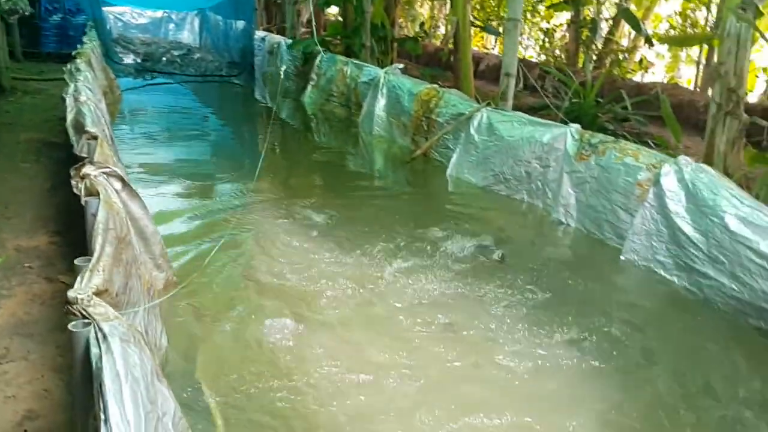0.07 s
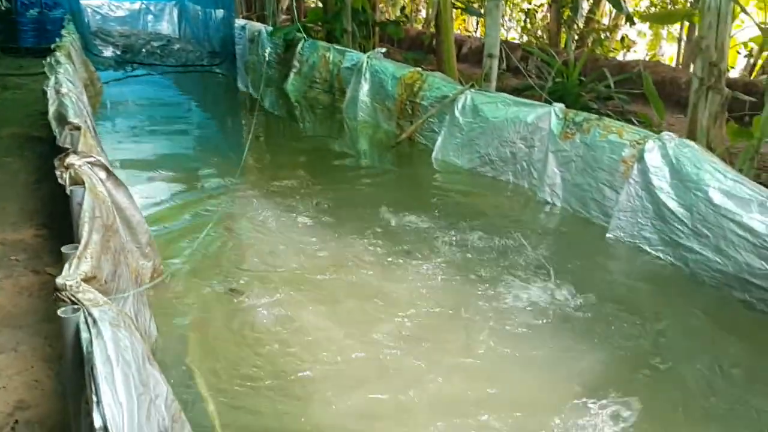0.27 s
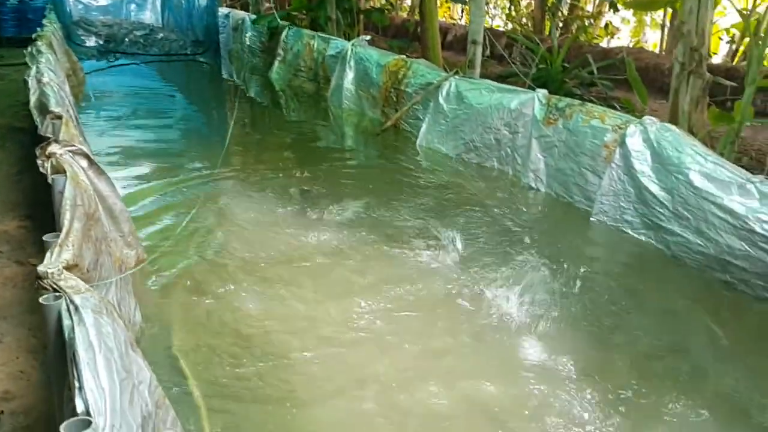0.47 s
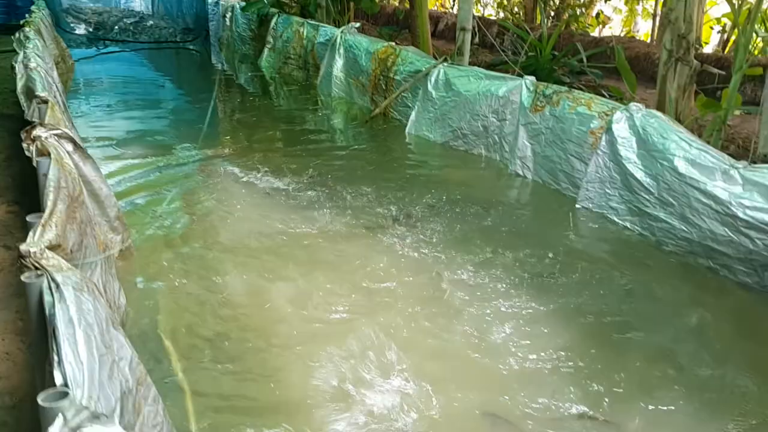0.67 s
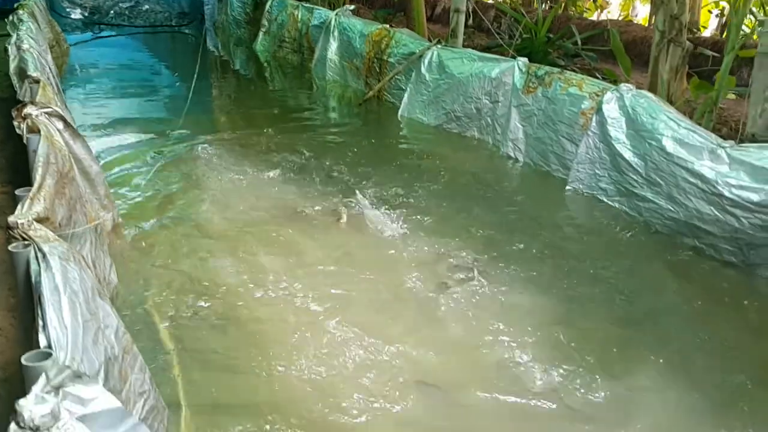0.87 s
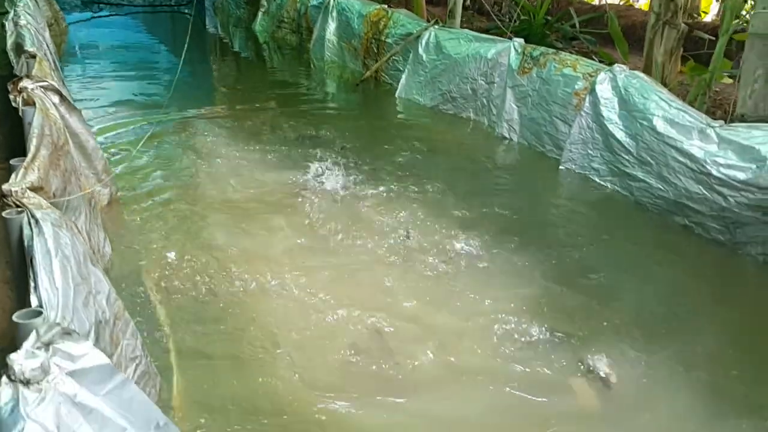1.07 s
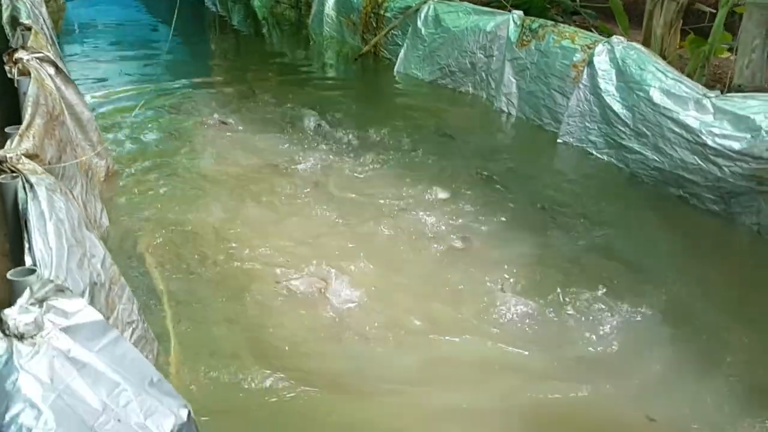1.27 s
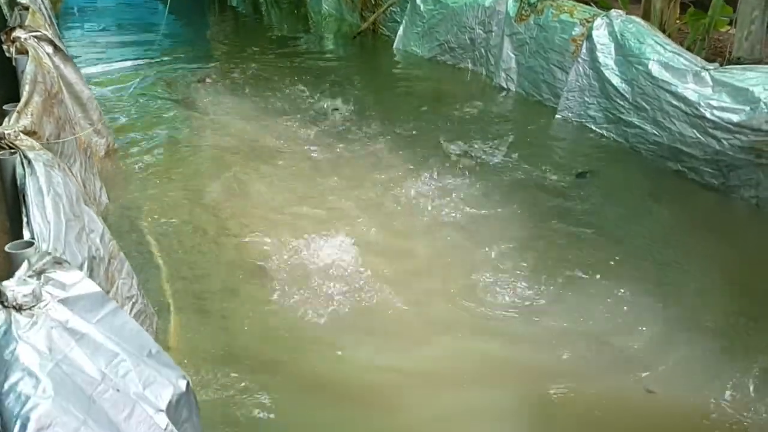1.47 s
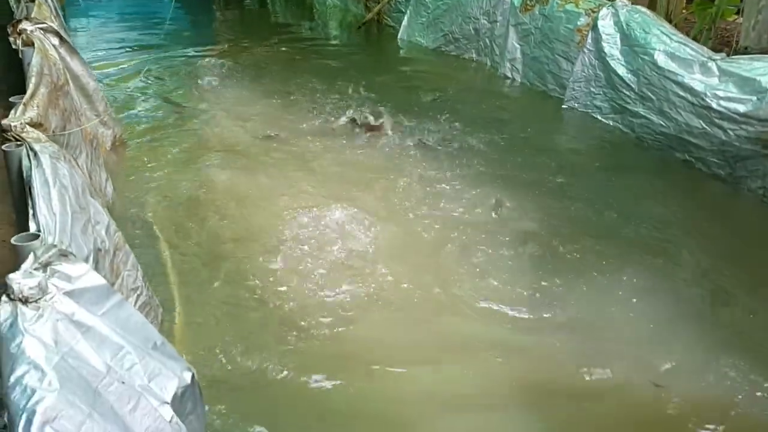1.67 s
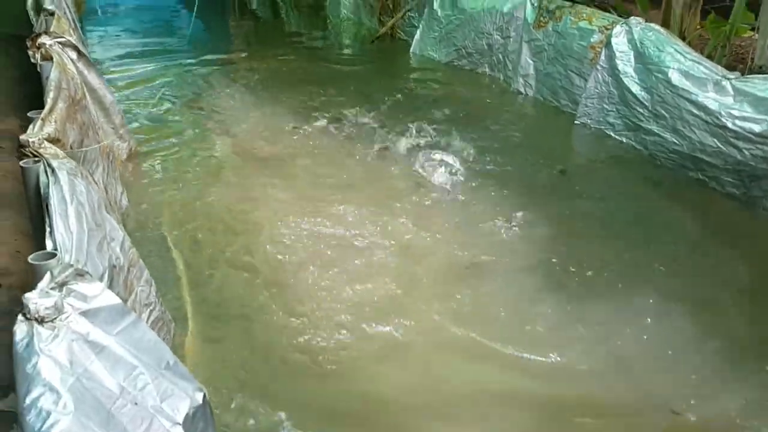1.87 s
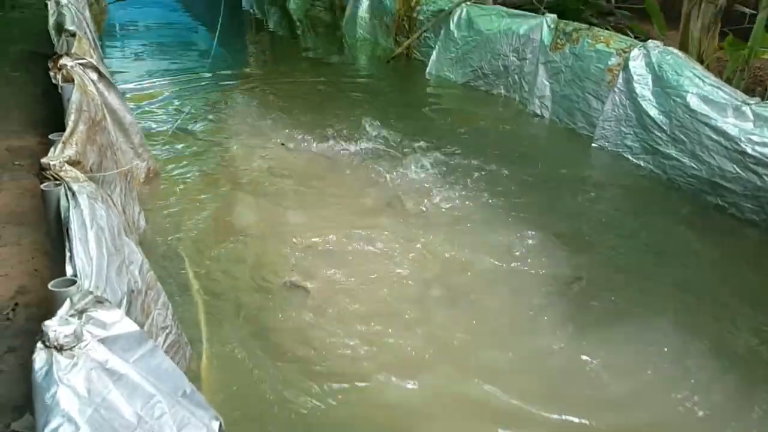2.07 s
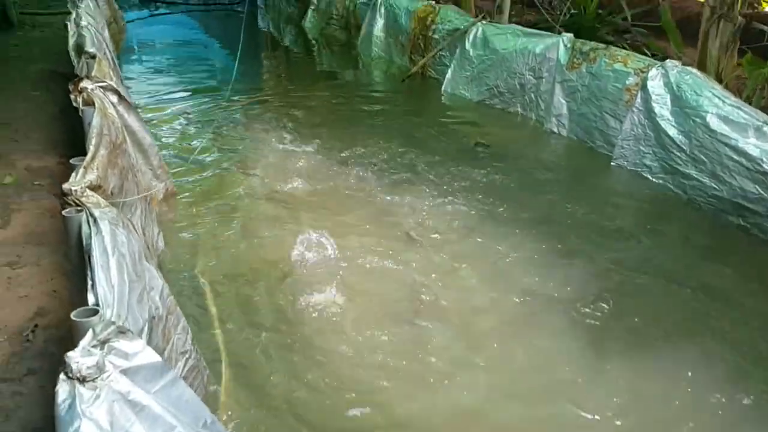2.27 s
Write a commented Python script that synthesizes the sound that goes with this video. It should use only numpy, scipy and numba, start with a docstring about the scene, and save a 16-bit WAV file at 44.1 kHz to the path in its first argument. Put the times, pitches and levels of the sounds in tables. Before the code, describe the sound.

Many small fish splash at a pond surface in a feeding frenzy, with rapid tail slaps, bubbly plops and fine spray over steady churning water; outdoors, close, almost entirely in the left channel, right very faint.

```python
"""Sheet-lined pond outdoors: small fish feed at the surface, over a steady patter of churned water.
Slaps and spray are decaying band noise; gulps, bubbles, drops and thrashing are decaying, sliding sines.
Churned water adds drops, dry ticks and flickering noise. Mist and a light, rising wind are shaped noise.
A small bird whistles once, a gliding sine.
The left microphone faces the pond; the right is nearly blocked and hears it faintly, over its own hiss."""
import sys
import numpy as np
from scipy import signal
from scipy.fft import rfft, irfft, next_fast_len
from scipy.io import wavfile
from numba import njit

SR = 44100
rng = np.random.default_rng(int(sys.argv[2]) if len(sys.argv) > 2 else 0)


def digitize_waveform(pressure):
    """Quantize a signal to 16-bit integers and store it at the path in sys.argv[1].

    Rows of a 2-D input are taken as channels; values are limited to [-1, 1].
    """
    field = np.atleast_2d(pressure).T
    bounded = np.clip(field, -1, 1)
    quanta = np.round(bounded * 32767).astype(np.int16)
    wavfile.write(sys.argv[1], SR, quanta)


N = 102753

# All table levels are relative; each source adds its own gain.
# larger bubbles trapped by mouths and tails: (time [s], pitch [Hz], level [dB], nominal ring time [s])
BUBBLES = [(0.0793, 1473, -29, 0.04), (0.1287, 1034, -32, 0.024), (0.1776, 2098, -33, 0.033),
           (0.1796, 3107, -30, 0.049), (0.1856, 1309, -29, 0.018), (0.1896, 817, -28, 0.025),
           (0.2115, 995, -24, 0.034), (0.2424, 471, -36, 0.04), (0.2519, 1362, -28, 0.027),
           (0.2519, 2098, -33, 0.019), (0.2529, 2987, -32, 0.039), (0.2674, 3635, -34, 0.034),
           (0.2705, 4977, -30, 0.01), (0.2764, 597, -37, 0.03), (0.2834, 480, -35, 0.03),
           (0.2938, 2872, -34, 0.021), (0.4146, 1119, -19, 0.03), (0.4151, 2987, -29, 0.02),
           (0.4255, 1164, -29, 0.03), (0.4195, 900, -26, 0.02), (0.4415, 1164, -33, 0.02),
           (0.458, 4424, -30, 0.01), (0.4899, 698, -27, 0.035), (0.507, 560, -33, 0.015),
           (0.5108, 3932, -36, 0.018), (0.6151, 1593, -31, 0.021), (0.6311, 1034, -28, 0.021),
           (0.7114, 1473, -32, 0.051), (0.7398, 2098, -31, 0.028), (0.8531, 1532, -29, 0.027),
           (0.8531, 2987, -23, 0.03), (0.8635, 1259, -31, 0.034), (0.895, 2455, -29, 0.031),
           (1.0257, 2553, -29, 0.035), (1.0721, 817, -32, 0.063), (1.1344, 786, -29, 0.04),
           (1.1778, 2269, -30, 0.024), (1.1983, 1593, -31, 0.024), (1.1998, 1210, -31, 0.037),
           (1.2477, 2182, -28, 0.027), (1.2626, 2017, -33, 0.016), (1.3424, 1724, -26, 0.03),
           (1.3464, 755, -23, 0.054), (1.3679, 671, -34, 0.058), (1.3684, 2098, -30, 0.021),
           (1.3784, 1259, -28, 0.016), (1.4068, 1532, -30, 0.022), (1.4108, 671, -34, 0.034),
           (1.4345, 1259, -24, 0.03), (1.4382, 3635, -30, 0.028), (1.4517, 5000, -23, 0.01),
           (1.4578, 919, -23, 0.022), (1.4435, 1300, -24, 0.02), (1.4632, 3107, -33, 0.025),
           (1.4995, 919, -24, 0.012), (1.5066, 1259, -32, 0.04), (1.5101, 646, -30, 0.025),
           (1.5365, 345, -19, 0.036), (1.537, 1939, -31, 0.06), (1.7086, 1657, -32, 0.019),
           (1.7425, 1657, -28, 0.024), (1.7535, 3107, -35, 0.021), (1.773, 1657, -31, 0.049),
           (1.7745, 900, -27, 0.025), (1.778, 4786, -27, 0.012), (1.7994, 1034, -30, 0.022),
           (1.8009, 2455, -33, 0.031), (1.8588, 2098, -29, 0.031), (1.8588, 4254, -31, 0.018),
           (1.9326, 490, -35, 0.04), (1.9476, 1210, -30, 0.022), (1.9496, 817, -29, 0.042),
           (2.0169, 3635, -36, 0.021), (2.0184, 1657, -30, 0.027), (2.0513, 552, -34, 0.052),
           (2.0833, 2553, -31, 0.022), (2.1072, 995, -29, 0.028), (2.312, 800, -32, 0.03)]
# deep gulps: (time [s], level [dB], pitch [Hz])
GULPS = [(0.2635, -32, 390), (0.434, -50, 360), (0.507, -43, 285), (0.615, -47, 355), (0.702, -42, 385),
         (1.151, -45, 360), (1.176, -42, 330), (1.245, -37, 220), (1.294, -46, 330), (1.495, -42, 398),
         (1.5375, -42, 200), (1.729, -50, 296), (2.161, -43, 420), (2.176, -43, 210), (2.216, -39, 390),
         (2.268, -47, 400)]
GULP_CYCLES, ATTACK_CYCLES, BUBBLE_RISE_PER_CYCLE, NEIGHBOUR_GAIN = 4.5, .45, .0012, .35
BUBBLE_DELAY_S, BUBBLE_RING_SHARE, POP_DB, POP_CYCLES, BUBBLE_SLIDE = .0013, .8, 2.5, 3.5, .008
GULP_FLOOR_HZ = 185
# tail slaps on the surface: (time [s], level [dB], centre [Hz])
SLAPS = [(0.1047, -33, 3500), (0.1795, -32, 3090), (0.2535, -25, 3200), (0.3356, -33, 1600),
         (0.3745, -33, 2050), (0.4155, -23, 2200), (0.4913, -32, 2850), (0.5117, -30, 2400),
         (0.6155, -30, 1560), (0.7407, -27, 2490), (0.853, -29, 2400), (0.8959, -26, 2800),
         (0.9348, -28, 3200), (0.9872, -30, 3000), (1.0126, -33, 2840), (1.054, -30, 3000),
         (1.1608, -33, 2460), (1.1787, -29, 2800), (1.1992, -36, 1540), (1.2486, -27, 2200),
         (1.3428, -29, 1730), (1.3718, -27, 1900), (1.4381, -25, 3200), (1.446, -28, 2000),
         (1.461, -30, 3000), (1.5005, -30, 1660), (1.5375, -30, 4500), (1.6072, -32, 3430),
         (1.7085, -33, 4540), (1.7444, -30, 1660), (1.7774, -25, 4500), (1.7998, -30, 1670),
         (1.8592, -25, 3000), (2.0168, -31, 2400), (2.138, -32, 5000), (2.1789, -32, 2400),
         (2.2513, -37, 2400)]
SLAP_WIDTH_OCT, SLAP_CRACK_DB, SLAP_T60_S = 1.3, -1.5, .07
SLAP_NOISE_DB, SLAP_CLOUD_DB, SLAP_FLOOR_HZ = -2.5, -7, 300
BURST_GRAIN_DB, CRACK_HEIGHT = 2.5, 2.2  # slaps and spray
# longer thrashing of several fish: (start [s], length [s], level [dB], centre [Hz])
THRASHES = [(.245, .06, -36, 1500), (.85, .12, -37, 800), (1.34, .08, -32, 1500), (1.432, .048, -27, 2000),
            (1.5, .04, -34, 1100), (1.92, .06, -36, 1000), (2.04, .07, -36, 1500), (2.135, .03, -36, 4800),
            (1.38, .05, -38, 3500)]
THRASH_WIDTH_OCT = .8
# bursts of fine spray: (time [s], level [dB], centre [Hz], decay to -60 dB [s])
SPRAY = [(0.3356, -45, 9550, 0.09), (0.3726, -46, 9150, 0.09), (0.4564, -45, 8770, 0.09),
         (0.5716, -44, 9060, 0.09), (0.7407, -43, 12000, 0.04), (0.7482, -38, 8600, 0.06),
         (0.8759, -42, 9570, 0.04), (0.8954, -28, 12500, 0.028), (1.054, -45, 8870, 0.09),
         (1.0874, -47, 7670, 0.09), (1.1473, -52, 10000, 0.09), (1.1782, -39, 10800, 0.07),
         (1.2486, -48, 6940, 0.09), (1.4381, -42, 9440, 0.25), (1.5, -46, 8040, 0.09),
         (1.5329, -43, 9070, 0.04), (1.5988, -47, 9420, 0.09), (1.7719, -38, 13000, 0.03),
         (1.778, -35, 9000, 0.06), (1.8592, -37, 9920, 0.15), (1.9829, -45, 11100, 0.09),
         (2.0787, -43, 9000, 0.15), (2.139, -38, 6980, 0.06)]
SPRAY_WIDTH_OCT = 1.1
# activity of the shoal: (time [s], churned water level [dB], fine mist level [dB])
ACTIVITY = [(0.0, -42, -62), (0.15, -42, -62), (0.52, -43, -62), (1.06, -44, -65), (1.3, -45, -64),
            (1.59, -42, -63), (1.97, -42, -62), (2.06, -43, -62), (2.21, -46, -67), (2.33, -46, -67)]
# churned water spectrum: (frequency [Hz], density [dB per Hz])
CHURN_SPECTRUM = [(88, -49), (150, -19), (272, -13), (470, -1), (579, -6), (812, -1), (1250, -2),
                  (1400, -3), (2580, -4), (5300, -8), (7000, -28), (9100, -58), (15400, -120)]
DROPS_PER_S, DROP_CYCLES, DROP_SPREAD_DB, DROP_RISE_PER_CYCLE = 1000, 14.0, 3.3, .008
TICKS_PER_S, TICK_SPREAD_DB, TICK_LOW_HZ = 600, 3.6, 2600  # rate before clumping
DROPS_DB, WASH_DB, TICKS_DB = -3.5, -5, -16
# fine mist spectrum: (frequency [Hz], density [dB per Hz])
MIST_SPECTRUM = [(3410, -30), (5800, 0), (6080, -4), (6820, -8), (9370, -6), (15100, -11), (16000, -15)]
# bird whistle: (time [s], pitch [Hz], level [dB])
WHISTLE = [(1.635, 4200, -58), (1.647, 4300, -50), (1.687, 4469, -50), (1.693, 4493, -54),
           (1.727, 4552, -46), (1.752, 4560, -50), (1.768, 4500, -62)]
# wind on the microphone: (time [s], level [dB])
WIND = [(0.0, -75), (0.21, -78), (1.12, -75), (1.15, -67), (1.49, -72), (1.52, -63), (1.65, -72),
        (1.69, -62), (1.78, -69), (2.12, -69), (2.2, -62), (2.33, -66)]
# wind spectrum: (frequency [Hz], density [dB per Hz])
WIND_SPECTRUM = [(24, -31), (42, -6), (62, 2), (95, -4), (260, -3), (340, -31), (570, -120)]
ECHO_DB, ECHO_T60_S = -9, .12
TOP_HZ, WATER_TOP_DB = 5600, -17  # water is quieter above TOP_HZ; spray is cut below it
RIGHT_DIRECT_DB, RIGHT_DIRECT_HZ, RIGHT_SCATTER_DB, RIGHT_SCATTER_HZ = -31.5, 900, -36, 600
RIGHT_WASH_DB, RIGHT_HISS_DB = -31.5, -72
# hiss of the right microphone: (frequency [Hz], density [dB per Hz])
RIGHT_HISS_SPECTRUM = [(10, -20), (20, -4), (80, -5), (120, -14), (300, -14), (3000, -16), (8000, -18),
                       (15500, -9)]
# steady offset, one row per channel: (offset [full scale])
OFFSET = [
    [-.00061],
    [-.00053],
]
CUTOFF_HZ = 15850


def bubbles():
    """Bubbles and gulps: a short pop at the start, a sliding ring, two neighbours beating against it."""
    gulps = [(s, hz, db + 6, GULP_CYCLES / hz) for s, db, hz in GULPS]
    s, hz, db, ring_s = np.transpose(list(BUBBLES) + gulps)
    s, t60 = s + BUBBLE_DELAY_S, 2 * BUBBLE_RING_SHARE * ring_s
    chance = rng.random((len(s), 5))
    wander = BUBBLE_SLIDE * (chance[:, 0] - .5) * np.minimum(1, 8.0 / (hz * ring_s))
    slide = BUBBLE_RISE_PER_CYCLE + wander
    out = ring(s, hz, amp(db), t60, slide, ATTACK_CYCLES)
    out += ring(s, hz, amp(db + POP_DB), POP_CYCLES / hz, slide, ATTACK_CYCLES / 3)
    for side, late, apart in ((1, chance[:, 1], chance[:, 2]), (-1, chance[:, 3], chance[:, 4])):
        near_s = s + .25 * late * ring_s
        near_hz = hz * (1 + side * (.07 + .16 * apart))
        out += NEIGHBOUR_GAIN * ring(near_s, near_hz, amp(db), t60, slide, ATTACK_CYCLES)
    return out


def slaps():
    """Tail slaps: noise bursts, the bubble clouds they free, and thrashing."""
    rows = [(*row, SLAP_T60_S) for row in SLAPS]
    noise = amp(SLAP_NOISE_DB) * bursts(rows, SLAP_WIDTH_OCT, SLAP_CRACK_DB)
    return noise + slap_clouds() + thrashing()


def slap_clouds(count=10):
    """Each slap frees a fading cloud of bubbles round its centre."""
    s, db, hz = np.array(SLAPS).T[..., None]
    chance = rng.random((len(SLAPS), count, 2))
    late = .4 * SLAP_T60_S * chance[..., 0] ** 2
    pitch_hz = hz * 2 ** (SLAP_WIDTH_OCT * (chance[..., 1] - .6))
    return small_bubbles(s + late, pitch_hz, db + SLAP_CLOUD_DB - 60 * late / SLAP_T60_S)


def thrashing(count=60):
    """A dense, wide cloud of bubbles that swells and ebbs."""
    s, length, db, hz = np.array(THRASHES).T[..., None]
    when = rng.random((2, len(THRASHES), count)).mean(0)  # densest midway
    octaves = THRASH_WIDTH_OCT * rng.standard_normal((len(THRASHES), count))
    pitch_hz = np.clip(hz * 2 ** octaves, 550, 6000)
    return small_bubbles(s + length * when, pitch_hz, db + 0 * when)


def spray():
    """Fine spray: bright noise bursts, only the top kept."""
    return steep(amp(-3) * bursts(SPRAY, SPRAY_WIDTH_OCT, crack_db=-1.5), TOP_HZ, "high")


def bursts(rows, width_oct, crack_db):
    """Each burst: a crack, then lumpy noise that dies away, coloured round its centre."""
    out, white = np.zeros(N), rng.standard_normal(N + SR) * .3
    white[:N] *= amp(BURST_GRAIN_DB * drift(150))
    for s, db, hz, t60 in rows:
        t = np.arange(int(t60 * SR)) / SR
        i = int(s * SR)
        crack = 1 + amp(crack_db) * np.exp(-t / .0006)
        push = white[i:i + len(t)] * amp(-60 * t / t60) * crack
        push[0] += CRACK_HEIGHT
        low, high = hz * 2 ** (-width_oct / 2), hz * 2 ** (width_oct / 2)
        level = amp(db + 6) * np.sqrt(SR / 2 / (high - low))  # offsets the loss to the band
        add(out, s, level * band(push, low, high))
    return out


def churned_water(churn_db):
    """Patter of drops, flickering wash and ticks, following the shoal's activity."""
    wash = patchy_noise(CHURN_SPECTRUM, patchy_db=2.2, rate_hz=9.0, low_hz=170, count=11)
    mix = amp(DROPS_DB) * drops() + amp(WASH_DB) * wash + amp(TICKS_DB) * ticks()
    return amp(churn_db + 6) * mix


def drops(count=2400):
    """Countless small drops and bubbles, in clumps, at random pitches; rms 1."""
    crowd, chance = np.cumsum(amp(3.5 * drift(9))), rng.random((count, 2))
    born = np.arange(count) < DROPS_PER_S * N / SR
    hz = 400 * 14 ** (chance[:, 1] ** .58)
    s = np.searchsorted(crowd, chance[:, 0] * crowd[-1]) / SR
    db = at_hz(CHURN_SPECTRUM, hz) + 9 * np.log10(hz)
    return rms_one(small_bubbles(s, hz, np.where(born, db, -1000)))


def ticks():
    """Droplets strike the surface in clumps: dry, bright ticks; rms 1."""
    sizes = amp(TICK_SPREAD_DB * np.minimum(rng.exponential(1, N), 4.0)) * rng.choice([-1, 1], N)
    born = rng.random(N) < TICKS_PER_S * amp(5.0 * drift(14)) / SR
    dealt = rng.integers(0, 6, N)
    out = np.zeros(N)
    for k, hz in enumerate(np.geomspace(TICK_LOW_HZ, 7000, 6)):
        out += band(sizes * born * (dealt == k) + 1e-18, hz / 1.5, hz * 1.8)
    return rms_one(out)


def mist(mist_db):
    """Fine mist: flickering treble noise, following the shoal's activity."""
    return amp(mist_db + 8) * patchy_noise(MIST_SPECTRUM, patchy_db=1.6, rate_hz=12.0, low_hz=5000, count=4)


def bird():
    """One thin gliding whistle: a sine of changing pitch and level."""
    hz, db = in_time(WHISTLE)
    first_s, last_s = WHISTLE[0][0], WHISTLE[-1][0]
    on, = in_time([(first_s - .005, 0), (first_s, 1), (last_s, 1), (last_s + .005, 0)])
    return np.sqrt(2) * amp(db + 6) * on * np.sin(2 * np.pi * np.cumsum(hz) / SR)


def wind():
    """Wind on the microphone: low noise of wandering level."""
    return amp(in_time(WIND)[0] + 9 + 2.5 * drift(8.0)) * coloured(WIND_SPECTRUM)


def right_microphone(pond, churn_db):
    """Nearly blocked: dull direct sound, scatter, churned water from elsewhere in the pond, hiss."""
    hz = np.arange(N // 2 + 1) * SR / N
    direct = irfft(rfft(pond) / (1 + (hz / RIGHT_DIRECT_HZ) ** 2), N)
    scatter = band(scattered(pond, t60=.05), RIGHT_SCATTER_HZ, 7000)
    wash = band(coloured(CHURN_SPECTRUM), RIGHT_SCATTER_HZ, 8000)
    out = amp(RIGHT_DIRECT_DB) * direct + amp(RIGHT_SCATTER_DB) * scatter
    out += amp(RIGHT_WASH_DB + churn_db + 6) * wash
    return out + amp(RIGHT_HISS_DB) * coloured(RIGHT_HISS_SPECTRUM)


def scattered(x, t60):
    """Echoes off the pond walls and trees: a short dying scatter of unit energy."""
    t = np.arange(SR // 2) / SR
    tail = rng.standard_normal(len(t)) * amp(-60 * t / t60) * np.minimum(t / .003, 1)
    return signal.fftconvolve(x, tail / np.sqrt(np.sum(tail ** 2)))[:N]


def small_bubbles(s, hz, db):
    """Small bubbles of uneven strength and length, most of them rising in pitch."""
    chance = rng.random(s.shape + (3,))
    gain = amp(db - DROP_SPREAD_DB * (1 + np.log(chance[..., 0] + .02)))
    t60 = DROP_CYCLES * (.4 + 1.4 * chance[..., 1]) / hz
    rise = DROP_RISE_PER_CYCLE * (3 * chance[..., 2] - 1)
    return ring(s.ravel(), hz.ravel(), gain.ravel(), t60.ravel(), rise.ravel(), ATTACK_CYCLES)


def ring(start, hz, gain, t60, rise, attack_cycles):
    """Each bubble swells, rings and slides in pitch as it dies."""
    return ring_loop(np.column_stack([start, hz, gain, t60, rise]), float(attack_cycles), N, SR)


@njit
def ring_loop(rows, attack_cycles, size, rate):
    """Decaying sines; rows of start [s], pitch [Hz], gain, T60 [s] and pitch rise per cycle."""
    out = np.zeros(size)
    for start, hz, gain, t60, rise in rows:
        i = max(int(start * rate), 0)
        fade, swell = 1000. ** (-1 / rate / t60), np.exp(-hz / rate / attack_cycles)
        rest = 1.
        for j in range(min(int(t60 * rate * .7), size - i) if gain > 0 else 0):
            cycles = hz * j / rate
            out[i + j] += gain * (1 - rest) * np.sin(2 * np.pi * cycles * (1 + rise * cycles / 2))
            gain, rest = gain * fade, rest * swell
    return out


def patchy_noise(spectrum, patchy_db, rate_hz, low_hz, count):
    """Half-octave bands that flicker partly together, partly alone; rms 1."""
    noise, together, out = [coloured(spectrum), coloured(spectrum)], drift(rate_hz), 0
    for k, low in enumerate(low_hz * 2 ** (np.arange(count) / 2)):
        flicker = amp(patchy_db * (.7 * together + drift(rate_hz)))
        out = out + flicker * band(noise[k % 2], low, low * np.sqrt(2))
    return rms_one(out)


def coloured(spectrum):
    """Smooth noise of a given spectrum; rms 1."""
    size = next_fast_len(N)
    hz = np.arange(1, size // 2 + 2) * SR / size
    return rms_one(irfft(rfft(rng.standard_normal(size)) * amp(at_hz(spectrum, hz)), size)[:N])


def drift(rate_hz):
    """Slow random wander, spread 1: noise through two equal poles, at SR / 40."""
    r = np.exp(-80 * np.pi * rate_hz / SR)
    slow = signal.lfilter([1], [1, -2 * r, r * r], rng.standard_normal(N // 40 + 2002))[2000:]
    return np.interp(np.arange(N) / 40, np.arange(len(slow)), rms_one(slow))


def band(x, low_hz, high_hz):
    """Gentle band-pass."""
    high_hz = min(high_hz, .45 * SR)
    return signal.sosfilt(signal.butter(2, [low_hz, high_hz], "band", fs=SR, output="sos"), x)


def steep(x, hz, kind, order=14):
    """Steep low- or high-pass."""
    return signal.sosfilt(signal.butter(order, hz, kind, fs=SR, output="sos"), x)


def amp(db):
    """Amplitude of a level in dB."""
    return 10 ** (np.asarray(db) / 20)


def rms_one(x):
    """Scale to rms 1."""
    return x / np.sqrt(np.mean(x ** 2) + 1e-20)


def in_time(rows):
    """Columns of a table, joined by lines in time."""
    s, *columns = np.transpose(rows)
    return [np.interp(np.arange(N) / SR, s, c) for c in columns]


def at_hz(points, hz):
    """Spectrum level [dB], joined by lines over log frequency."""
    return np.interp(np.log(hz), np.log(np.array(points)[:, 0]), np.array(points)[:, 1])


def add(out, s, sound):
    """Mix a sound in at a time [s]."""
    i = max(int(s * SR), 0)
    out[i:i + len(sound)] += sound[:N - i]


def scene():
    """Fish with their echoes, churned water, mist, spray, bird and wind at two microphones."""
    churn_db, mist_db = in_time(ACTIVITY)
    fish = steep(bubbles(), GULP_FLOOR_HZ, "high", order=4) + steep(slaps(), SLAP_FLOOR_HZ, "high")
    wet = fish + amp(ECHO_DB) * scattered(fish, ECHO_T60_S) + churned_water(churn_db)
    water = steep(wet, TOP_HZ, "low") + amp(WATER_TOP_DB) * steep(wet, TOP_HZ, "high")
    pond = water + mist(mist_db) + spray() + bird()
    return np.array([pond + wind(), right_microphone(pond, churn_db)])


def record(dry):
    """Cut the top with a steep low-pass, then add a small steady offset."""
    cut = signal.ellip(12, .5, 70, CUTOFF_HZ, fs=SR, output="sos")
    return signal.sosfilt(cut, dry) + np.array(OFFSET)


dry = scene()
out = record(dry)
digitize_waveform(out)
```